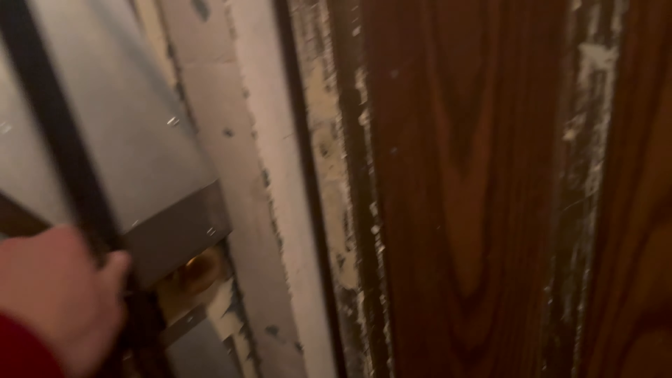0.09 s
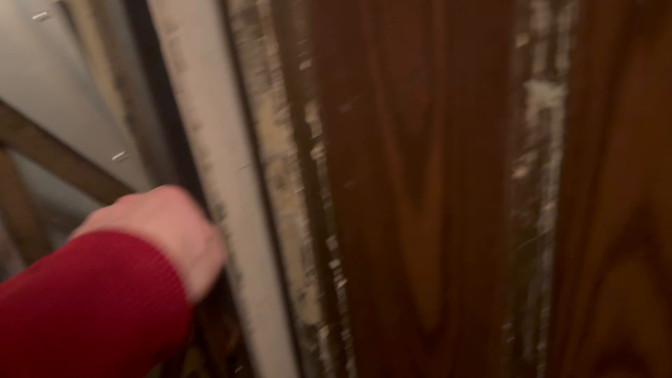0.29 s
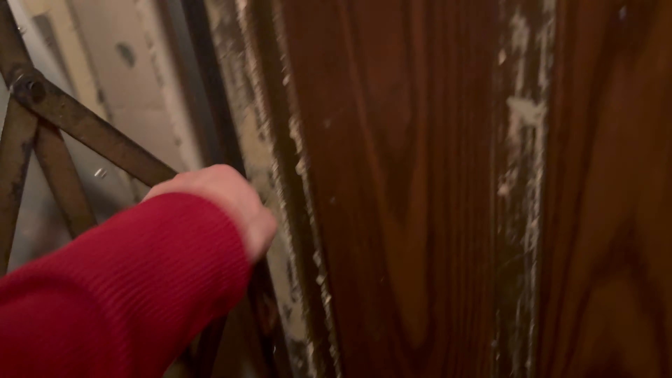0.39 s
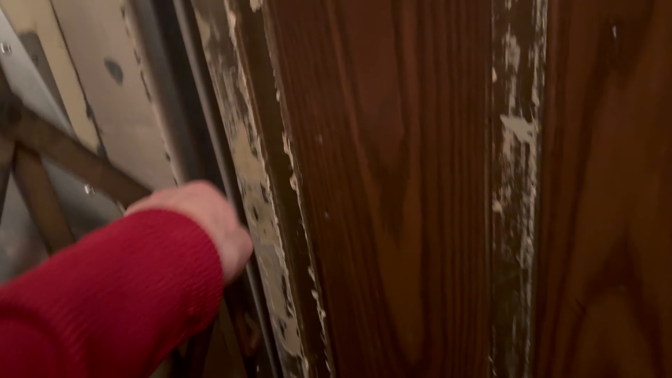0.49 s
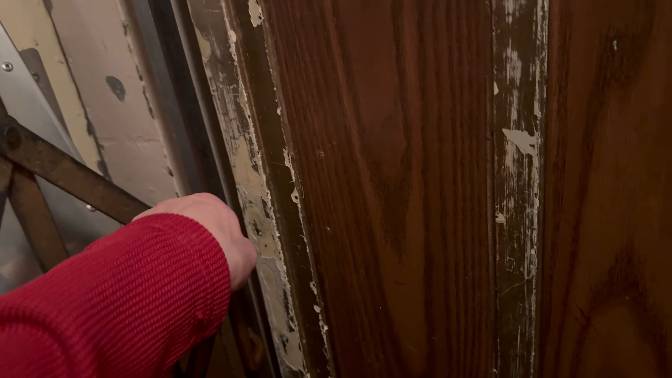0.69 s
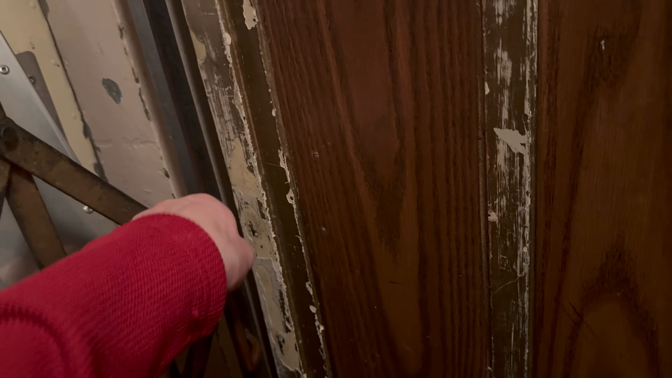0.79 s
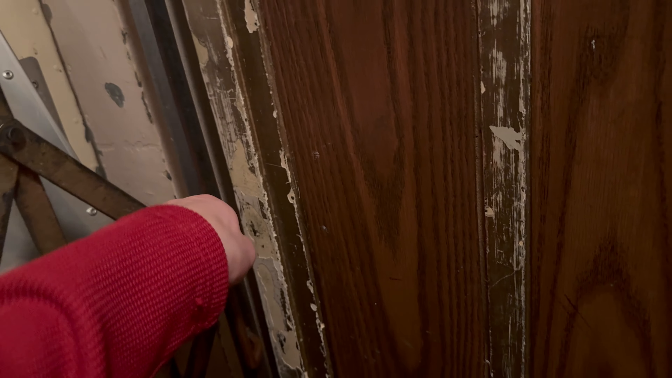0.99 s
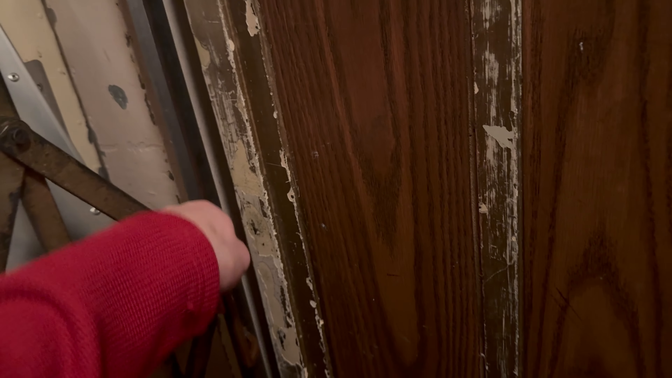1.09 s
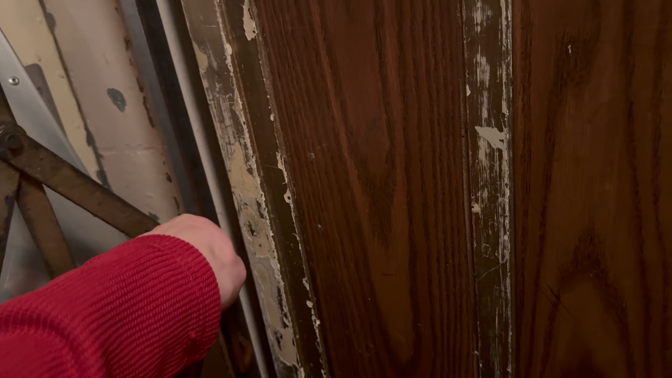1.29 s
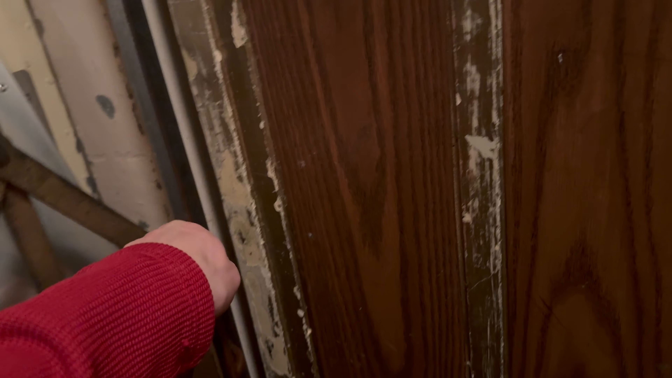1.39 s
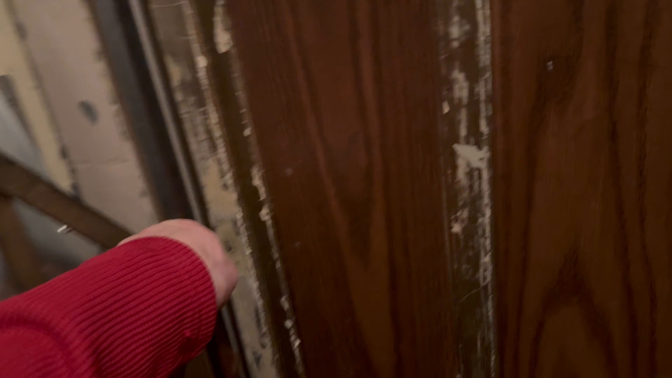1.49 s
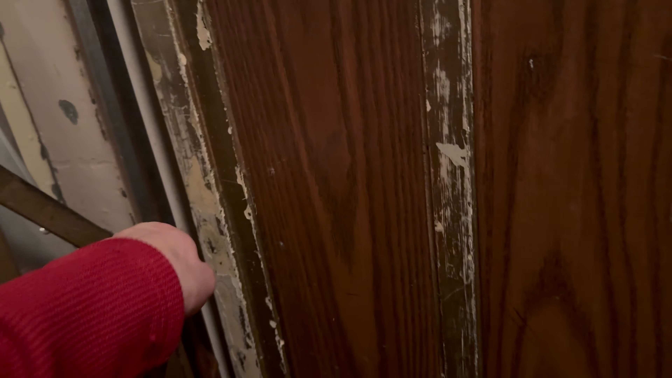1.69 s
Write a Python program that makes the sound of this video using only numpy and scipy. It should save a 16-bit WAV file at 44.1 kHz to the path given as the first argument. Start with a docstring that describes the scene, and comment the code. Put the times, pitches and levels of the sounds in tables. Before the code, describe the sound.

Close stereo inside a cramped wooden lift car: a metal lattice gate clanks and rattles heavily early on, settles with smaller knocks and faint ticks, then its latch snaps very sharply with a short low boom.

```python
"""Lift gate pushed shut

A steel collapsible gate is pushed shut in a small wooden lift car, heard from close by in stereo.
Blows are noise cracks that ring bar and wall modes, with dense echoes of the car; a latch snaps near 1.42 s.
Under them the lattice rattles in tiny clicks, panels hum, the car rumbles and the largest panel booms."""
import sys
import numpy as np
from scipy import signal
from scipy.fft import rfft, irfft, next_fast_len
from scipy.io import wavfile

SR = 44100
rng = np.random.default_rng(int(sys.argv[2]) if len(sys.argv) > 2 else 0)


def output_pcm(signal):
    """Save a mono or channel-first signal as 16-bit PCM at the path in sys.argv[1].

    Samples are clipped to [-1, 1] before scaling.
    """
    pcm = np.clip(np.atleast_2d(signal).T, -1, 1) * 32767
    wavfile.write(sys.argv[1], SR, np.round(pcm).astype(np.int16))


def ratio_of_db(decibels):
    """Turn decibels (scalar or array-like) into linear amplitude factors; 0 dB maps to 1."""
    return 10 ** (np.asarray(decibels, float) / 20)


N = 77175  # samples, 1.75 s

# Ringing modes of the steel bars. Each row: frequency in Hz, relative level in dB, t60 in seconds.
BAR_MODES = [(1057, 2, 0.11), (1486, 6, 0.057), (1619.4, 5.5, 0.06), (1919, -7.5, 0.29), (2094, -8.5, 0.12),
             (2500, 0.5, 0.036), (3390, -14, 0.1), (3700, -4.5, 0.057), (4110, -7, 0.07), (5090, -2, 0.039)]
# Ringing modes of the car's panels. Each row: frequency in Hz, relative level in dB, t60 in seconds.
PANEL_MODES = [(224.7, -9.5, 0.24), (308, -7, 0.058), (419.7, 0, 0.051), (513.4, -2.5, 0.13),
               (556.6, 2, 0.069), (630.6, 6.5, 0.044), (761.7, -3, 0.055), (930.3, -4, 0.06),
               (1296.5, -3.5, 0.073)]


def evened(x):
    """Scales a sound to an rms of one."""
    return x / np.sqrt(np.mean(x ** 2) + 1e-20)


def read(points, hz):
    """Reads a (Hz, value) curve, straight between its points on a log frequency axis."""
    f, value = np.transpose(points)
    return np.interp(np.log(hz + 1), np.log(f + 1), value)


def coloured(x, points):
    """Filters the last axis by a (Hz, dB) spectrum."""
    hz = np.fft.rfftfreq(x.shape[-1], 1 / SR)
    return irfft(rfft(x) * ratio_of_db(read(points, hz)), x.shape[-1])


def ring(modes, rise_cycles=1):
    """Dying sines, one set per channel; each mode is three close neighbours, random at every strike."""
    spread_db, neighbour_db = 2.5, -1.5
    detune = 0.0322  # typical shift of a neighbour, as a share of its frequency
    channel_rad = 0.76  # phase scatter of a mode between the channels
    t = np.arange(SR // 4) / SR
    hz, db, t60 = np.transpose(modes * 3)[:, None, :, None]
    level, tune, phase = rng.standard_normal((3, 2, hz.size, 1))
    tune = tune[:1]  # both channels share the same tuning
    tune[:, :len(modes)] = 0  # the first of the three stays in tune
    db = db + neighbour_db * (tune != 0)
    decay = ratio_of_db(db + spread_db * level - 60 * t / t60)
    start_rad = 2 * phase[:1] + channel_rad * phase[::-1]
    sines = decay * np.sin(2 * np.pi * hz * (1 + detune * tune) * t + start_rad)
    sines = sines * (1 - np.exp(-t * hz / rise_cycles))
    early_power = (sines[..., :800] ** 2).sum(1).mean()  # over the first 18 ms
    return sines.sum(1) / np.sqrt(early_power)


def car_rumble():
    """Low rumble of the car: noise with most of its power below about 120 Hz."""
    # Each row: frequency in Hz, relative level in dB per Hz.
    rumble_spectrum = [(18, 1), (34, 8.5), (86, 9.5), (124, -4.5), (180, -32), (310, -120)]
    return evened(coloured(rng.standard_normal((2, N)), rumble_spectrum))


def joint_grains():
    """Friction of the joints: noise gated by dense tiny clicks, over smooth sliding noise."""
    clicks_per_s, size_db = 1500, 3.7  # click sizes are spread exponentially in dB
    scrape_db = 6  # sliding noise against the rms of the click envelope
    clicks = ratio_of_db(size_db * np.minimum(rng.exponential(1, N), 5))
    clicks = clicks * (rng.random(N) < clicks_per_s / SR)
    click_decay = np.exp(-np.arange(200) / 31.0)  # time constant 0.7 ms
    envelope = evened(signal.oaconvolve(clicks, click_decay)[:N])
    return (envelope + ratio_of_db(scrape_db)) * rng.standard_normal((2, N))


def rung_by(grains, spectrum, modes, ring_db):
    """Coloured grains, plus the same grains ringing a set of modes at a relative level."""
    rung = evened(signal.fftconvolve(grains, ring(modes), axes=1)[:, :N])
    return evened(evened(coloured(grains, spectrum)) + ratio_of_db(ring_db) * rung)


def lattice_rattle(grains):
    """Bright rattle of the lattice: joint grains that partly ring the bars."""
    # Each row: frequency in Hz, relative level in dB per Hz.
    rattle_spectrum = [(500, -72), (1000, 0.5), (3000, -3.5), (6500, -4), (12000, -6), (15000, -13.5)]
    return rung_by(grains, rattle_spectrum, BAR_MODES, ring_db=-18)


def panel_hum(grains):
    """Hum of the panels: the same joint grains, darker, partly ringing the panel modes."""
    # Each row: frequency in Hz, relative level in dB per Hz.
    hum_spectrum = [(110, -2.5), (180, 4.5), (600, -1), (1100, -12), (2200, -59)]
    return rung_by(grains, hum_spectrum, PANEL_MODES, ring_db=-12.5)


def lattice():
    """The shaking lattice: rattle, panel hum and car rumble, each following its own level in time."""
    # Each row: time in seconds, rms level in dB of the rattle, of the panel hum, of the rumble.
    shaking = [(0.0, -39, -40, -45), (0.228, -40.5, -38, -49.5), (0.282, -33, -31, -33),
               (0.336, -39.5, -27, -52), (0.362, -16, -31, -48), (0.418, -20, -25, -46),
               (0.462, -21, -26, -39), (0.49, -27, -25.5, -28.5), (0.584, -24.5, -25.5, -32),
               (0.629, -33, -30.5, -28), (0.72, -32.5, -31.5, -38.5), (0.81, -46, -33.5, -42),
               (0.936, -55.5, -46.5, -40), (1.167, -56, -43, -44.5), (1.32, -59.5, -53, -52.5),
               (1.398, -49.5, -54, -53), (1.468, -41.5, -27.5, -43), (1.687, -56, -52.5, -50.5),
               (1.75, -63.5, -51, -54)]
    times, *levels_db = np.transpose(shaking)
    t = np.arange(N) / SR
    rattle, hum, rumble = (ratio_of_db(np.interp(t, times, db)) for db in levels_db)
    grains = joint_grains()
    return rattle * lattice_rattle(grains) + hum * panel_hum(grains) + rumble * car_rumble()


def booms():
    """Booms of the largest wall panel: low sines that rise slowly and die away."""
    # Each row: start in seconds, level in dB ahead of rise and decay, frequency in Hz, t60 in seconds.
    boom_rows = [(.0, -36, 164.4, 0.88), (0.244, -20, 143.3, 0.28), (1.447, -19, 154.5, 0.25)]
    rise_s = 0.0088
    out = 0
    for start, db, hz, t60 in boom_rows:
        t = np.maximum(np.arange(N) / SR - start, 0)
        rise = (1 - np.exp(-t / rise_s)) ** 2
        sine = np.sin(2 * np.pi * (hz * t + rng.random()))
        out = out + ratio_of_db(db - 60 * t / t60) * rise * sine
    return out


def car(x):
    """Dense echoes of the small car: a noise tail, each band dying at its own speed."""
    # Each row: frequency in Hz, t60 in seconds.
    car_decay = [(100, 0.21), (400, 0.46), (1500, 0.28), (5000, 0.25), (12000, 0.16)]
    rise_s = 0.0072  # the echoes swell in over this time
    hz, t, z = signal.stft(rng.standard_normal((2, SR)), SR, nperseg=256)
    decay = ratio_of_db(-60 * t / read(car_decay, hz)[:, None])
    tail = signal.istft(z * decay, SR, nperseg=256)[1]
    tail *= np.minimum(np.arange(tail.shape[1]) / SR / rise_s, 1) ** 2
    return signal.fftconvolve(x, tail / np.linalg.norm(tail[0]), axes=1)[:, :N]


def knock(crack_db, crack_hz, octaves, bar_db, thud_db, contact_ms):
    """Metal contact cracks as a burst of noise; bars and panels ring up over a few cycles."""
    rise_share = 0.017  # of the contact length
    favour_db = -2  # per squared crack width: a blow rings the bar modes near its own centre best
    t = np.arange(SR // 4) / SR
    hz = np.fft.rfftfreq(len(t), 1 / SR)
    hump = np.exp(-0.5 * (np.log2((hz + 1) / crack_hz) / octaves) ** 2)
    noise = evened(irfft(rfft(rng.standard_normal((2, len(t)))) * hump, len(t)))
    u = 1000 * t / contact_ms  # time in contact lengths
    crack = noise * np.exp(-u) * np.minimum(u / rise_share, 1)
    bars = [(f, db + favour_db * (np.log2(f / crack_hz) / octaves) ** 2, t60) for f, db, t60 in BAR_MODES]
    bar_ring = ratio_of_db(bar_db) * ring(bars, rise_cycles=6.9)
    thud = ratio_of_db(thud_db) * ring(PANEL_MODES, rise_cycles=4.1)
    return ratio_of_db(crack_db) * (crack + bar_ring + thud)


def gate_blows():
    """All blows of gate and latch, each laid in at its start."""
    # Each row: start in seconds, crack level in dB, crack centre in Hz, crack width in octaves,
    # bar ring and panel thud in dB against the crack, contact length (decay constant) in ms.
    knock_rows = [(0.0199, -31.5, 2380, 0.84, -5, -35, 37), (0.0893, -32, 4030, 0.29, -20, -7, 21),
                  (0.115, -28.5, 2900, 1.4, -7, -18.5, 5.1), (0.2416, -13.5, 2500, 1.13, -10.5, -9.5, 6),
                  (.2930, -11.5, 1080, 1.84, -8, -8, 12.4), (0.3573, -12.5, 4220, 0.88, -12, -8.5, 23),
                  (0.661, -29, 4200, 0.63, -15, -14, 63), (.6775, -22.5, 2220, 2.2, -7, -7.5, 10.5),
                  (0.8376, -27.5, 2570, 1.5, -4.5, -13, 5.6), (0.8460, -41, 1006, 0.34, 5.5, -5, 6),
                  (0.854, -33, 6950, 2.3, -34, -6, 18), (.9250, -39, 2500, 2.7, -9.5, -4.5, 8.4),
                  (1.0283, -38.5, 3870, 0.49, -7.5, -13, 7.2), (1.149, -45, 1800, 0.78, -10.5, -1.5, 6),
                  (1.18, -49, 1800, 0.68, -7, 1.5, 5.2), (1.2338, -46.5, 8500, 0.38, -33, -27, 6.4),
                  (1.2870, -58, 3750, 0.25, -2.5, -22, 8.3), (1.3615, -34, 2680, 0.52, -8.5, -9, 3.5),
                  (1.4204, -2.5, 7060, 0.33, -47, -35.5, 1.27), (1.4195, -17, 4300, 1.06, -28, -18.5, 18.7),
                  (1.435, -27, 1160, 0.93, -9, -2, 30), (1.5911, -39.5, 6740, 0.52, -32, -9.5, 4.5)]
    hits = np.zeros((2, N + SR))
    for start, *row in knock_rows:
        sound = knock(*row)
        first = round(start * SR)
        hits[:, first:first + sound.shape[1]] += sound
    return hits[:, :N]


def scene():
    """Blows with their echoes in the car, over the booms and the shaking lattice."""
    hits = gate_blows()
    echo_db = -4
    return hits + ratio_of_db(echo_db) * car(hits) + booms() + lattice()


def low_pass(x):
    """Removes everything above the highest recorded frequency."""
    return signal.sosfilt(signal.butter(12, 16490, fs=SR, output="sos"), x)


def record(dry):
    """Stereo image: bass is shared in phase; the top treble is one signal, inverted and earlier on the right."""
    # Each row: frequency in Hz, left-right likeness from 0 to 1.
    likeness = [(60, 0.98), (130, 0.97), (290, 0.75), (640, 0.18), (1400, 0.0041), (6000, 0.096)]
    treble_from_hz, treble_span_hz = 8820, 500
    lead_s = 0.0003196  # right side ahead of the left in the treble
    phase_dwell = 0.27  # the treble phase lingers near in-phase and anti-phase
    edge_hz, edge_width_hz = 15600, 220  # soft upper band limit
    size = next_fast_len(N + 999)
    hz = np.fft.rfftfreq(size, 1 / SR)
    a, b = rfft(dry, size)
    treble = np.clip((hz - treble_from_hz) / treble_span_hz, 0, 1)
    treble_same = np.sin(np.pi / 2 * np.sin(np.pi / 2 * treble))
    same = np.maximum(np.clip(read(likeness, hz), 0, 1), treble_same)
    lead = 2 * np.pi * hz * lead_s  # radians
    inverted = -np.exp(1j * (lead - phase_dwell * np.sin(2 * lead)))
    turn = np.where(treble > 0, inverted, 1)
    right = same * turn * a + np.sqrt(1 - same ** 2) * b
    edge = 1 / (1 + np.exp((hz - edge_hz) / edge_width_hz))
    stereo = irfft(edge * np.array([a, right]), size)[:, :N]
    return low_pass(stereo)


dry = scene()
out = record(dry)
output_pcm(out)
```